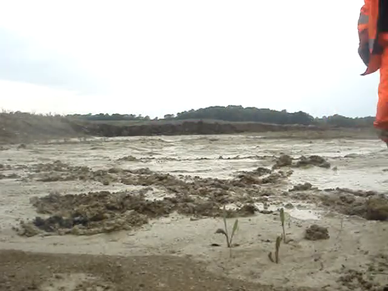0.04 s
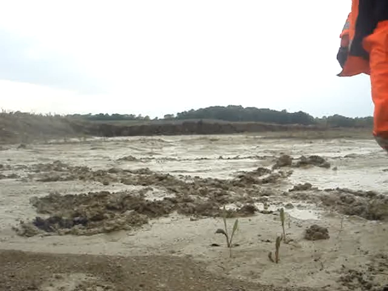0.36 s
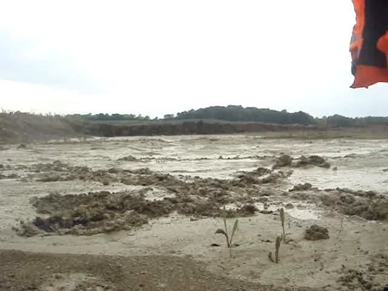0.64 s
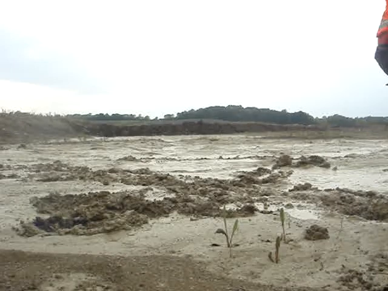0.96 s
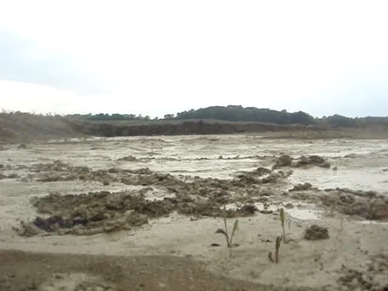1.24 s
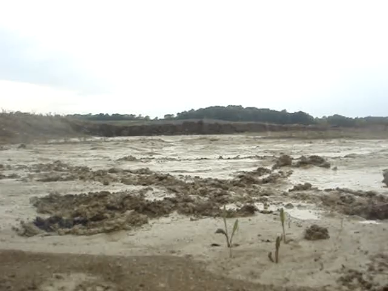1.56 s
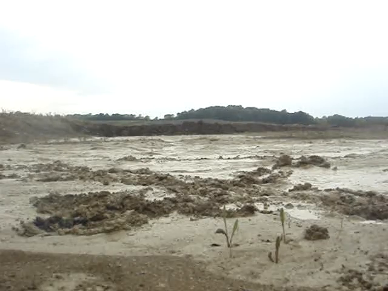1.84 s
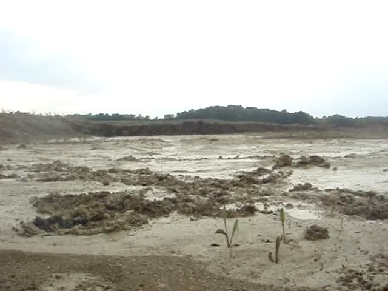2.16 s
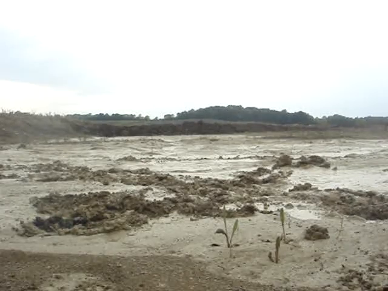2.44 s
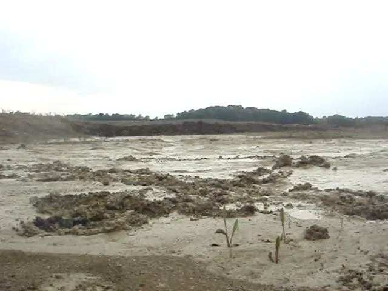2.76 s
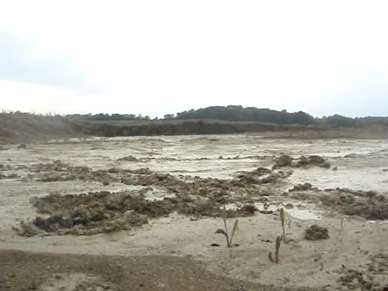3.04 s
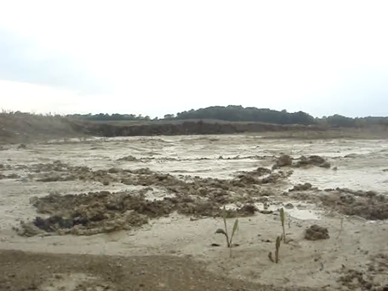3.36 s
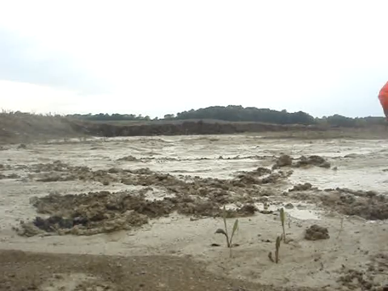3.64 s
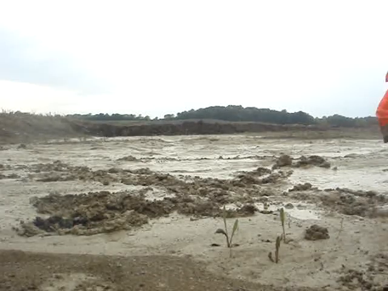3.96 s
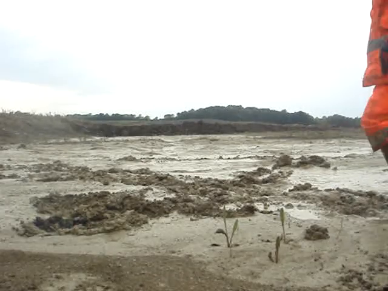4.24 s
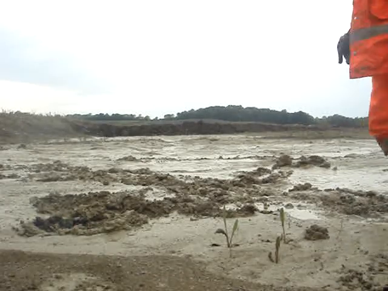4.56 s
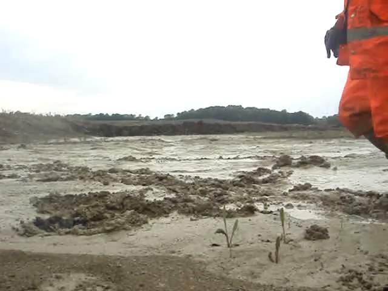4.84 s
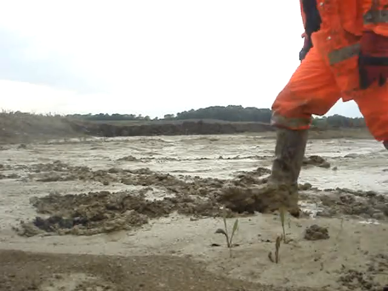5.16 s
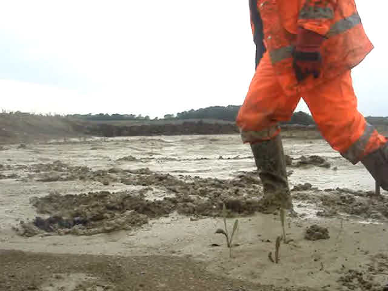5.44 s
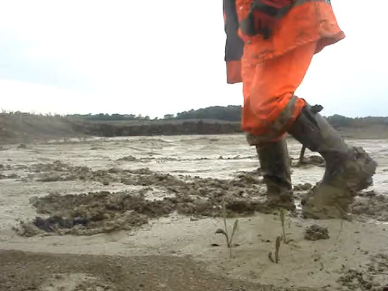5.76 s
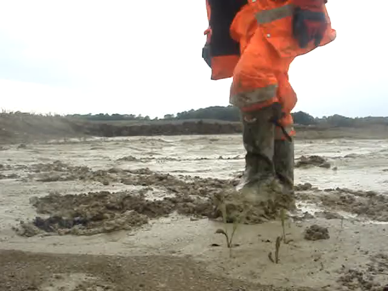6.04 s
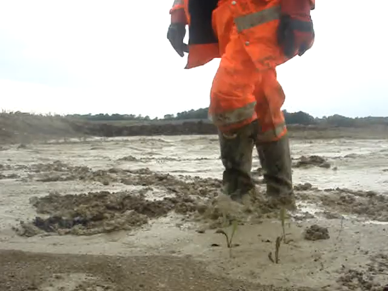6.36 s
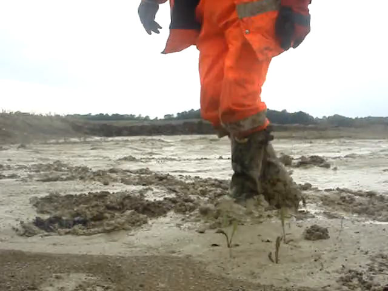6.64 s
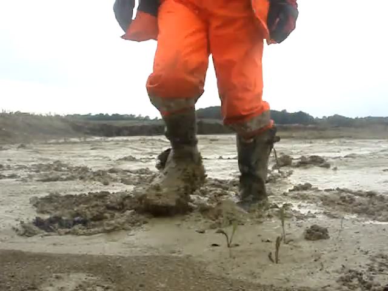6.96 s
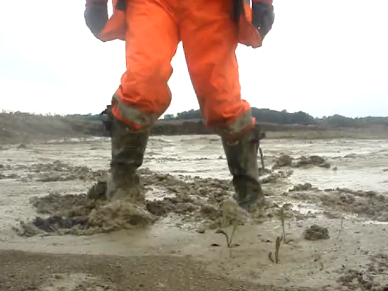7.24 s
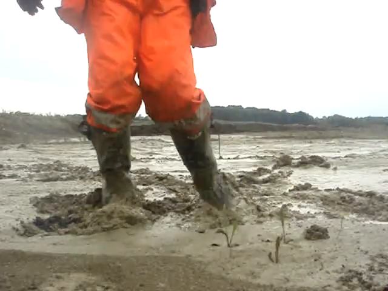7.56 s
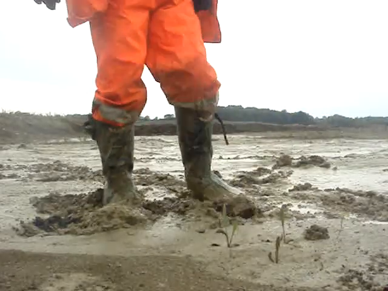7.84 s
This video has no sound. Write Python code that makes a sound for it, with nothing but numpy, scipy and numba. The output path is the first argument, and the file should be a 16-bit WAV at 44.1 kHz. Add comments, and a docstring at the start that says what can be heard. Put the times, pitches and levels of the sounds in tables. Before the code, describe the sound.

Rubber boots wade through sloppy mud on an open flat, a few steps from a low microphone. A cluster of wet squelches and sharp pops comes first, then sparser steps, then a busier run toward the end. Dull bumps and tiny air squeaks mark some steps, and the mud keeps bubbling and fizzing between them. Faint wind and a low hum lie behind.

```python
"""An open mud flat with no walls: rubber boots wade through the slop, a few steps from a low microphone.
Each step squeezes out a gurgling, spitting cloud of tiny air cells that ring as they burst.
Trapped pockets pop, wet films snap, air squeaks through narrow gaps and the ground bumps under the weight.
The mud goes on oozing between steps; faint wind and a low hum lie behind."""
import sys
import numpy as np
from scipy import signal
from scipy.fft import rfft, irfft
from scipy.io import wavfile
from scipy.ndimage import uniform_filter1d
from numba import njit

SR = 44100
rng = np.random.default_rng(int(sys.argv[2]) if len(sys.argv) > 2 else 0)


def waveform_to_disk(signal):
    """Save audio, clipped to [-1, 1], as 16-bit WAV at the path in sys.argv[1]."""
    frames = np.transpose(np.atleast_2d(signal))
    scaled = np.clip(frames, -1, 1) * 32767
    samples = np.round(scaled).astype(np.int16)
    wavfile.write(sys.argv[1], SR, samples)


N = 357210
TIME = np.arange(N) / SR

# Levels and pitches in the tables are nominal: each layer trims them.
# tone colour of still outdoor air: frequency_hz, density_db
AIR_SPECTRUM = [(25, -23), (50, -6.5), (90, -0.5), (170, 1), (300, -2.5), (550, -4), (1000, -6),
                (1700, -10.5), (2800, -10.5), (4500, -26.5), (6500, -20.5), (8300, -18.5), (10000, -28.5)]
# rise and fall of the soft wind: time_s, level_db
WIND_LEVELS = [(0.0, -61), (0.38, -49), (0.97, -58), (1.67, -47.5), (2.1, -56), (2.26, -51.5), (3.54, -55),
               (4.4, -48.5), (5.19, -52), (5.73, -44), (5.93, -44.5), (6.16, -54), (6.38, -50),
               (6.63, -42.5), (6.95, -44), (7.51, -51.5), (7.71, -52), (8.1, -46.5)]
# a low hum that comes and goes: time_s, level_db
HUM_LEVELS = [(0, -68), (.5, -62), (.75, -49), (1, -74), (1.25, -55.5), (1.75, -56.5), (2, -67.5),
              (5.4, -64), (5.8, -53.5), (6.35, -49.5), (6.6, -59.5), (8.1, -69)]
# a boot sinks or slides slowly under the body's weight: crest_s, half_width_s, bubbling_db, fizz_db
BOOT_SLIDES = [(0.485, 0.15, -40.5, -43), (0.835, 0.18, -39.5, -42.5), (1.06, 0.15, -42, -44.5),
               (1.38, 0.13, -43.5, -45), (1.632, 0.12, -46, -54), (2.08, 0.44, -46.5, -56.5),
               (2.856, 0.23, -51, -55.5), (3.34, 0.12, -42.5, -46), (3.908, 0.057, -44.5, -48.5),
               (4.845, 0.28, -46.5, -50), (5.346, 0.1, -42.5, -41.5), (5.88, 0.35, -45.5, -41.5),
               (6.808, 0.21, -42, -40.5), (7.313, 0.22, -51.5, -48.5), (7.79, 0.26, -50, -50)]
# the weight of a boot landing: start_s, level_db
BOOT_LANDINGS = [(0.563, -28), (3.739, -30.5), (5.205, -39), (6.085, -36), (7.098, -33), (7.149, -43)]
# air squeezed through narrow gaps: start_s, length_s, first_pitch_hz, last_pitch_hz, level_db
GAP_SQUEAKS = [(0.789, 0.018, 1810, 2920, -34), (1.065, 0.016, 3930, 4430, -33),
               (2.064, 0.032, 1140, 2360, -35.5), (2.11, 0.025, 1700, 2500, -38),
               (3.037, 0.11, 4800, 4600, -52.5), (3.996, 0.017, 1470, 2950, -31),
               (5.365, 0.03, 3660, 4300, -39.5), (5.707, 0.14, 2280, 2800, -43.5),
               (6.269, 0.0093, 3810, 4430, -29.5)]
# wet films that snap: start_s, peak_db, pitch_hz
FILM_SNAPS = [(0.545, -20, 1570), (0.9152, -9.5, 1860), (0.9674, -9.5, 2800), (1.071, -17, 3600),
              (1.4359, -19.5, 1600), (1.6057, -23, 1900), (3.5048, -12.5, 3560), (3.7665, -4, 4100),
              (3.7742, -12, 3850), (4.8848, -17.5, 2560), (4.9166, -19, 3870), (5.021, -21, 2400),
              (5.0972, -21, 4000), (6.0855, -7.5, 2360), (6.1264, -9.5, 2180), (6.2717, -18.5, 2060),
              (7.0951, -14, 2760), (7.1012, -6.5, 4160), (7.151, -4.5, 2280)]
# large air pockets that burst: start_s, peak_db, pitch_hz, opening_ms
AIR_POCKETS = [(0.7752, -21, 1440, 0.99), (1.021, -14.5, 776, 1.64), (1.157, -26.5, 1220, 1.4),
               (1.5837, -26.5, 645, 1.8), (1.801, -25.5, 540, 2.9), (2.1823, -21.5, 1470, 0.26),
               (3.3567, -28, 1170, 0.87), (3.5057, -25.5, 1200, 1.2), (3.814, -24.5, 1490, 1.4),
               (3.866, -29, 1600, 1.1), (4.4635, -16, 1060, 2.2), (4.5132, -8, 920, 0.51),
               (4.6145, -19, 546, 1.04), (4.683, -27, 590, 2.6), (5.537, -12, 630, 2.2),
               (5.863, -20, 850, 2.6), (5.8687, -11, 707, 3.4), (5.891, -14, 1050, 0.86),
               (6.9134, -22.5, 1310, 1.5), (7.1484, -10.5, 1230, 0.85)]
# mud squeezed or torn by a boot: crest_s, rise_s, fall_s, gurgle_hz, gurgle_db, spray_hz, spray_db
BOOT_SQUELCHES = [(0.528, 0.014, 0.016, 1120, -28.5, 2890, -33.5),
                  (0.566, 0.0074, 0.021, 846, -23, 2940, -32.5),
                  (0.809, 0.017, 0.023, 1310, -47, 2470, -36),
                  (0.892, 0.0044, 0.015, 1150, -30, 3630, -27.5),
                  (0.918, 0.014, 0.024, 1130, -33, 2960, -26.5),
                  (0.944, 0.016, 0.019, 990, -29.5, 3270, -29),
                  (0.9705, 0.002, 0.01, 1040, -31.5, 2780, -27.5), (1.85, 0.01, 0.037, 894, -31, 2950, -33),
                  (2.127, 0.038, 0.018, 1120, -36, 2370, -42.5), (2.34, 0.03, 0.025, 795, -35, 2770, -41),
                  (2.389, 0.033, 0.052, 745, -40, 3150, -38), (3.226, 0.0048, 0.009, 870, -36, 2700, -49.5),
                  (3.724, 0.0046, 0.007, 1300, -40, 2960, -43),
                  (3.742, 0.0061, 0.015, 960, -30.5, 3430, -25),
                  (3.986, 0.019, 0.0067, 1220, -39, 2240, -33.5),
                  (4.452, 0.0025, 0.017, 1120, -36, 2080, -42),
                  (4.482, 0.014, 0.013, 870, -27, 2500, -43.5),
                  (5.024, 0.0023, 0.0059, 1200, -43, 3440, -41),
                  (5.037, 0.0098, 0.0077, 890, -44.5, 3600, -33.5),
                  (5.065, 0.0037, 0.0041, 736, -57, 4300, -35), (5.101, 0.0033, 0.02, 820, -68, 3960, -37),
                  (5.151, 0.014, 0.012, 1350, -36.5, 3430, -38.5),
                  (5.21, 0.0076, 0.0065, 1296, -23.5, 2410, -18),
                  (5.282, 0.016, 0.014, 980, -24.5, 2500, -31.5),
                  (5.535, 0.014, 0.012, 673, -34.5, 2400, -41.5),
                  (5.897, 0.02, 0.015, 1020, -37.5, 3580, -31.5),
                  (6.091, 0.02, 0.011, 1095, -25.5, 2880, -24),
                  (6.116, 0.005, 0.0071, 1030, -24.5, 2630, -26),
                  (6.159, 0.008, 0.015, 1115, -29.5, 2130, -31.5),
                  (6.552, 0.022, 0.023, 935, -28.5, 2370, -39),
                  (7.102, 0.0088, 0.0046, 730, -31, 4100, -27), (7.126, 0.017, 0.03, 810, -39, 2930, -38.5),
                  (7.153, 0.0022, 0.0017, 1510, -23, 2320, -21),
                  (7.456, 0.038, 0.036, 1110, -34.5, 2980, -37)]


def undb(db):
    """Decibels to gain."""
    return 10 ** (np.asarray(db) / 20)


def unit(x):
    """Scale to rms 1."""
    return x / np.sqrt(np.mean(x ** 2) + 1e-18)


def fader(table):
    """A level curve drawn through rows of time_s, level_db."""
    return np.interp(TIME, *np.transpose(table))


def add(out, start_s, x):
    """Mix x into out from start_s."""
    i = max(int(start_s * SR), 0)
    out[i:i + len(x)] += x[:max(N - i, 0)]


def band(x, low_hz, high_hz, order=2):
    """Band-pass."""
    return signal.sosfilt(signal.butter(order, [low_hz, high_hz], "band", fs=SR, output="sos"), x)


def wobble(rate_hz):
    """Slow random modulation, rms 1."""
    hold = int(SR / rate_hz)
    steps = np.repeat(rng.standard_normal(N // hold + 1), hold)
    return unit(uniform_filter1d(steps, hold)[:N])


@njit
def ring(samples, start, hz, cycles, gain, glide):
    """Small cavities open, ring for a few cycles and glide in pitch."""
    out = np.zeros(samples)
    for k in range(len(start)):
        life, phase = cycles[k] * SR / hz[k], 0.
        for i in range(min(int(5 * life), samples - start[k])):
            age = i / life
            phase += 2 * np.pi * hz[k] * (1 + glide[k] * age) / SR
            out[start[k] + i] += gain[k] * (1 - np.exp(-4 * age)) * np.exp(-age) * np.sin(phase)
    return out


def cells(hz, per_s, octaves, cycles, scatter_db, glide, clump_db=3, drift=0.22, count=600):
    """The wet grain: a stream of bursting air cells scattered round the pitch track hz, rms 1."""
    gap, spread, length, strength, bend = rng.random((5, count))
    # neighbouring cells burst at like strengths and pitches
    clump, wander = (unit(uniform_filter1d(v, size=6)) for v in rng.standard_normal((2, count)))
    start = (np.cumsum(2 * gap) / per_s * SR).astype(np.int64)
    detune = octaves * np.log(spread / (1 - spread)) / 2 + drift * wander
    pitch = np.clip(hz[np.minimum(start, len(hz) - 1)] * 2 ** detune, 120, 12000)
    gain = undb(clump_db * clump - scatter_db * np.log(1 - .98 * strength)) * np.sqrt(pitch)
    return unit(ring(len(hz), start, pitch, cycles * (.5 + length), gain, glide * (2 * bend - .5)))


def outdoors(air_db=-47.5, gust_db=1.26, hum_hz=101, hiss_db=-69):
    """The bed: steady open air, a soft low wind, a wavering hum and a thin high hiss."""
    hz, db = np.transpose(AIR_SPECTRUM)
    bins_hz = np.arange(N // 2 + 1) * SR / N
    colour = undb(np.interp(np.log(bins_hz + 1), np.log(hz), db))
    air = unit(irfft(rfft(rng.standard_normal(N)) * colour, N))
    wind = unit(band(rng.standard_normal(N), 177, 442))
    wind *= undb(fader(WIND_LEVELS) + gust_db * wobble(8.8))
    hum_pitch = hum_hz * (1 + 0.0116 * wobble(6.6))
    hum = np.sqrt(2) * np.sin(2 * np.pi * np.cumsum(hum_pitch) / SR)
    hiss = unit(band(rng.standard_normal(N), 8030, 8230))
    return undb(air_db) * air + wind + undb(fader(HUM_LEVELS)) * hum + undb(hiss_db) * hiss


def creep(rest_db=-54.5, stir_db=-54, settle_s=.09, spatter_db=-19, spatter_s=0.086, fizz_lift_db=0.5):
    """Envelopes for bubbling and fizz: squelches leave settling mud and falling spray, slides a swell."""
    power = np.full(N, undb(rest_db) ** 2)
    t = TIME[:SR]
    settling = undb(stir_db) * np.exp(-t / settle_s)
    for crest_s, *_, spray_db in BOOT_SQUELCHES:
        spatter = undb(spray_db + spatter_db) * np.exp(-t / spatter_s)
        add(power, crest_s, settling ** 2 + spatter ** 2)
    bubble_power, fizz_power = power, power * undb(fizz_lift_db) ** 2
    for crest_s, half_width_s, bubbling_db, fizz_db in BOOT_SLIDES:
        swell = np.exp(-((TIME - crest_s) / half_width_s) ** 2)
        bubble_power += (undb(bubbling_db) * swell) ** 2
        fizz_power += (undb(fizz_db) * swell) ** 2
    return np.sqrt(bubble_power), np.sqrt(fizz_power)


def ooze(bubbling, fizzing, uneven_db=1.6):
    """Disturbed mud keeps bubbling and fizzing, unevenly, as it creeps back."""
    bubbles = cells(np.full(N, 1100.), per_s=1200, octaves=0.86, cycles=1.3,
                    scatter_db=5.0, glide=0.075, clump_db=1.5, count=13000)
    fizz = cells(np.full(N, 4100.), per_s=4000, octaves=0.782, cycles=3.6,
                 scatter_db=2.5, glide=0.032, clump_db=2.0, count=42000)
    texture = bubbling * unit(band(bubbles, 250, 8300)) + fizzing * unit(band(fizz, 1300, 8100))
    return undb(uneven_db * wobble(18)) * texture


def thuds(attack_s=0.0031, decay_s=0.015, trim_db=-5, slap_db=-2):
    """The soft ground takes the weight with a deep bump and a dull slap."""
    out, t = np.zeros(N), TIME[:SR // 6]
    envelope = np.exp(-t / decay_s) * (1 - np.exp(-t / attack_s))
    for start_s, level_db in BOOT_LANDINGS:
        bump = unit(band(rng.standard_normal(SR), 23, 54)[-len(t):])
        slap = unit(band(rng.standard_normal(len(t)), 90, 560))
        add(out, start_s, undb(level_db + trim_db) * (bump + undb(slap_db) * slap) * envelope)
    return out


def squeaks():
    """Air forced through a narrowing wet gap rings it, raggedly, on a sliding pitch."""
    out = np.zeros(N)
    for start_s, length_s, first_hz, last_hz, level_db in GAP_SQUEAKS:
        sweep = np.geomspace(first_hz, last_hz, int(length_s * SR))
        squeak = cells(sweep, per_s=1200, octaves=.05, cycles=4.5,
                       scatter_db=2, glide=.01, clump_db=1, drift=.03)
        add(out, start_s, undb(level_db) * squeak * np.hanning(len(sweep)))
    return out


def snaps(decay_s=0.0014, trim_db=-2):
    """A film of slurry tears in a quick run of ticks."""
    out, t = np.zeros(N), TIME[:SR // 80]
    for start_s, peak_db, hz in FILM_SNAPS:
        ticks = cells(np.full(len(t), float(hz)), per_s=2300, octaves=0.49, cycles=1.5,
                      scatter_db=1.5, glide=0.025, clump_db=2)
        tear = band(ticks * np.exp(-t / decay_s), 700, 14000)
        add(out, start_s, undb(peak_db + trim_db) * tear / np.abs(tear).max())
    return out


def pop(hz, opening_ms, glide=0.097, rim_db=-15):
    """An air pocket opens and rings briefly, its pitch rising as the hole widens; its rim crackles."""
    opening_samples = max(opening_ms, .4) / 1000 * SR
    age = np.arange(int(12 * opening_samples)) / opening_samples
    swell = (age * np.exp(1 - age)) ** 1.76
    pitch = hz * (1 + glide * (np.minimum(age, 4) - 1.4))
    tone = np.sin(2 * np.pi * np.cumsum(pitch) / SR)
    rim = cells(np.full(len(age), 2. * hz), per_s=2300, octaves=0.23, cycles=1.45,
                scatter_db=1, glide=0.019)
    return swell * (tone + undb(rim_db) * rim)


def pockets(bubbling, trim_db=-1, strays=36, stray_hz=824, stray_octaves=0.78, stray_lift_db=12.5):
    """Large air pockets pop on cue; small strays pop by chance, riding the level of the bubbling."""
    out = np.zeros(N)
    for start_s, peak_db, hz, opening_ms in AIR_POCKETS:
        add(out, start_s, undb(peak_db + trim_db) * pop(hz, opening_ms))
    for when, detune, strength in rng.random((strays, 3)):
        i = int(when * N)
        hz = stray_hz * 2 ** (stray_octaves * (2 * detune - 1))
        gain = bubbling[i] * undb(stray_lift_db) * (.5 + strength)
        add(out, TIME[i], gain * pop(hz, opening_ms=1.53))
    return out


def squelch(rise_s, fall_s, gurgle_hz, gurgle_db, spray_hz, spray_db, slosh_db=-13, quick_s=0.042):
    """Pressure builds and lets go: air cells gurgle upward as the gap closes, and fine spray spits."""
    length_s = rise_s + fall_s
    t = np.arange(-1.3 * rise_s * SR, 1.44 * fall_s * SR) / SR  # zero at the crest
    from_crest = np.abs(np.where(t < 0, t / rise_s, t / fall_s))
    pressure = np.exp(-1.6 * from_crest ** 0.79) * signal.windows.tukey(len(t), .15)
    closing = 2 ** (0.33 * t / length_s)
    # a quick tear crackles, a slow slide smears
    grit = min(quick_s / length_s, 1) ** 0.26
    gurgle = cells(0.967 * gurgle_hz * closing, per_s=1100, octaves=0.4, cycles=1.58,
                   scatter_db=4.0 * grit, glide=0.087, clump_db=5.3, drift=0.14)
    spray = cells(np.full(len(t), 0.986 * spray_hz), per_s=2600, octaves=0.63, cycles=0.96,
                  scatter_db=2.2 * grit, glide=0.051, clump_db=2 * grit, drift=0.23)
    # the channel under the sole rings on one sliding pitch
    channel = cells(.7 * spray_hz * closing ** 2.5, per_s=900, octaves=.08, cycles=3.5,
                    scatter_db=2, glide=.01, clump_db=1.5, drift=.07)
    # the bulk of the slurry shifts with a low slosh
    slosh = cells(np.full(len(t), 300.), per_s=500, octaves=0.57, cycles=0.86,
                  scatter_db=5.0, glide=0.025, clump_db=-5.5)
    layers = [(gurgle_db, band(gurgle, 120, 2700)), (spray_db - 0.5, band(spray, 1670, 10300)),
              (spray_db - 8, channel), (gurgle_db + slosh_db, slosh)]
    length_trim = np.sqrt(length_s * SR / len(t))
    return length_trim * sum(undb(db) * unit(layer * pressure) for db, layer in layers)


def squelches(spray_lift_db=2.38, shortest_s=.002):
    """Each push and pull of the boots squeezes or tears the mud."""
    out = np.zeros(N)
    for crest_s, rise_s, fall_s, gurgle_hz, gurgle_db, spray_hz, spray_db in BOOT_SQUELCHES:
        rise_s, fall_s = max(rise_s, shortest_s), max(fall_s, shortest_s)
        hit = squelch(rise_s, fall_s, gurgle_hz, gurgle_db, spray_hz, spray_db + spray_lift_db)
        add(out, crest_s - 1.3 * rise_s, hit)
    return out


def scene(scatter_db=-20, scatter_s=0.013):
    """The mono mix: wet mud with a faint scatter off the lumpy ground, over thuds and the outdoor bed."""
    bubbling, fizzing = creep()
    mud = squelches() + squeaks() + pockets(bubbling) + snaps() + ooze(bubbling, fizzing)
    t = TIME[:SR // 6]
    ground = band(rng.standard_normal(len(t)), 300, 3900) * np.exp(-t / scatter_s) * (t > .002)
    scatter = signal.fftconvolve(mud, ground / np.linalg.norm(ground))[:N]
    return (mud + undb(scatter_db) * scatter + thuds() + outdoors())[None]


def record(dry, scoop=0.28, dull_hz=9400, top_hz=10150):
    """A small camera's microphone: slightly scooped upper mids, dull treble and a steep cut on top."""
    scooped = dry - scoop * band(dry, 3160, 3700, order=1)
    dulled = signal.sosfilt(signal.butter(2, dull_hz, fs=SR, output="sos"), scooped)
    return signal.sosfilt(signal.ellip(10, .3, 70, top_hz, fs=SR, output="sos"), dulled)


dry = scene()
out = record(dry)
waveform_to_disk(out)
```